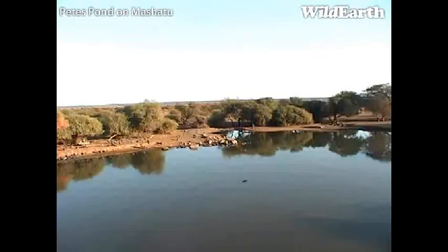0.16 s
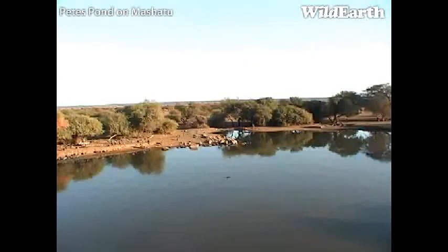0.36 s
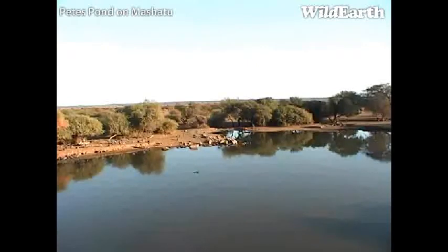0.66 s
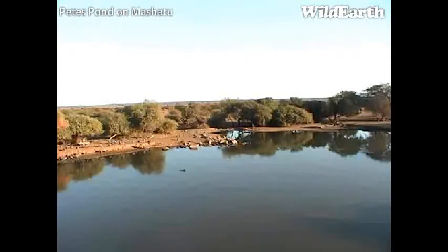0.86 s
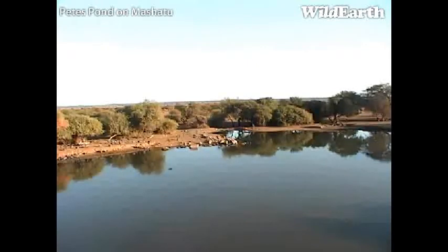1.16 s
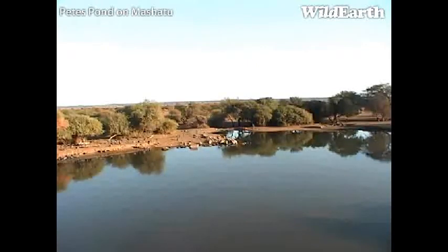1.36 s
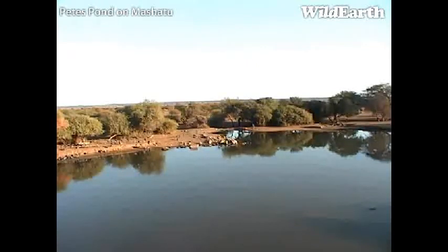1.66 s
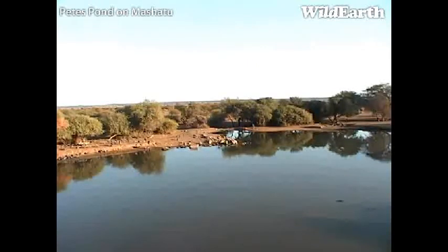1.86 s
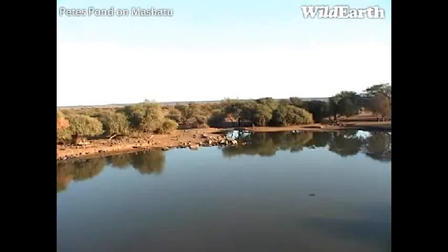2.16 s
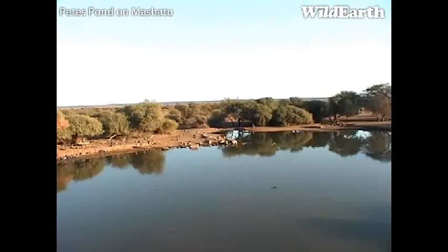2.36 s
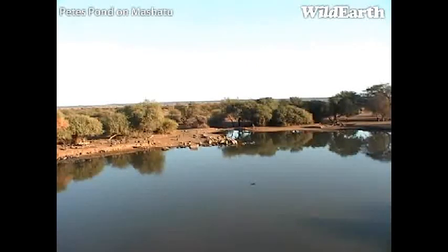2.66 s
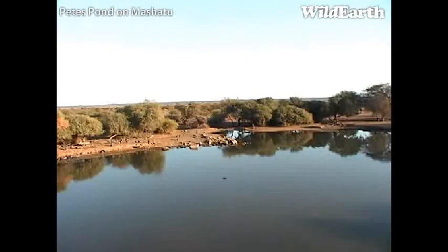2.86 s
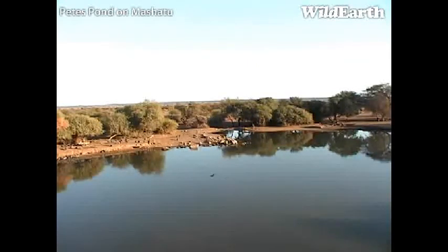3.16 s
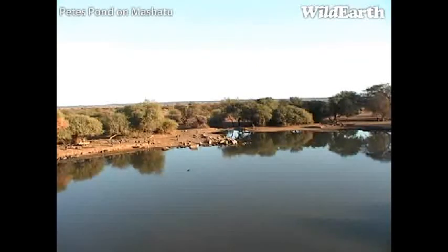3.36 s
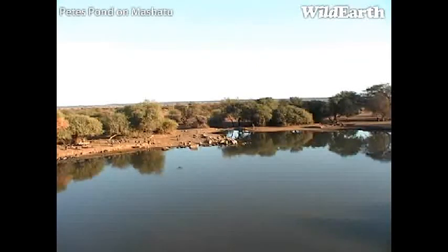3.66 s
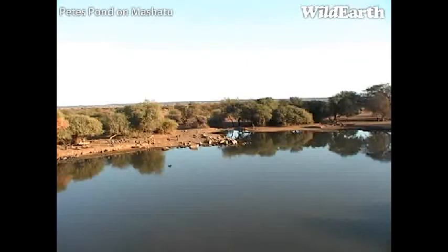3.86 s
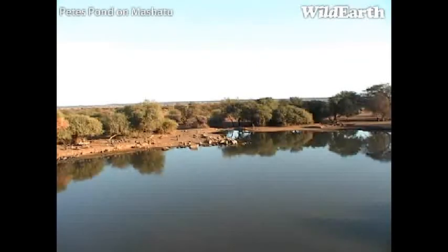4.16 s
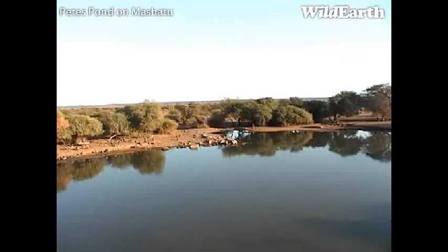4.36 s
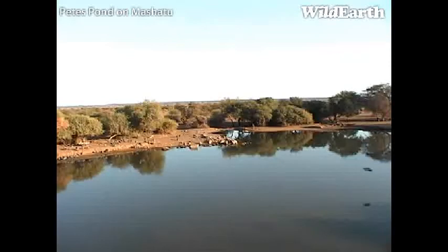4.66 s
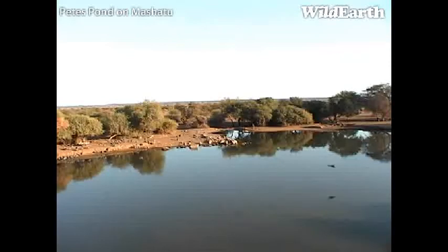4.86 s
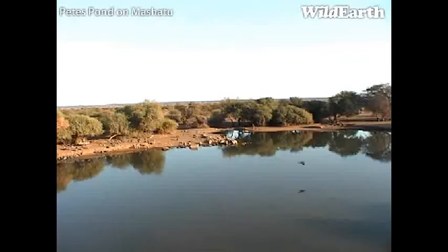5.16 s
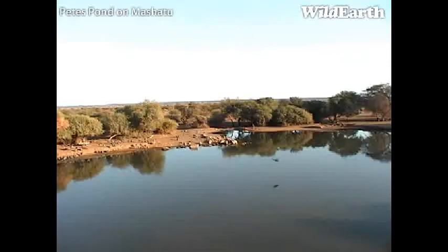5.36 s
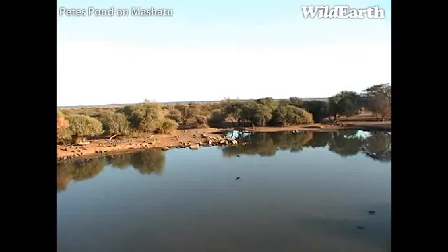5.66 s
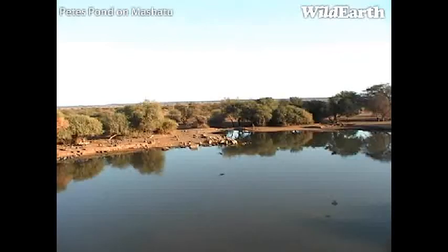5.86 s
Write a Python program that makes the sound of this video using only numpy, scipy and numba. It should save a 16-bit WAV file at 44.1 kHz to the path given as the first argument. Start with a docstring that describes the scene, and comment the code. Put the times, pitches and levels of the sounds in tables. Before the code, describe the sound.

An outdoor waterhole with a close guineafowl flock, heard almost in the centre, nearer calls a touch left. From 0 to 0.7 seconds scattered low knocks sit in a soft churr, with quick nasal chips and several ragged rasps around 0.25 to 0.5. From about 0.8 the knocks gather into overlapping runs, roughly nine a second each, hollow and throaty. A harsh cackle bursts at 1.4, others at 2.25 and 2.7, with thin whistles near 1.3, 1.6 and 2.2. Knocking is strongest from 2.3 to 3.2. Clear high peeps come at 3.4 and 3.6, fluttering whistles around 3.9 to 4.2, and a clipped cackle with a cheep at 4.6. Softer knocks continue through small cheeps, a dry tick at 5.4 and chips until 6. Faint distant twitter, low airy rush, slight hum and a weak bank echo lie beneath.

```python
"""Overlapping runs of low knocks, about nine a second in a run, lead a guineafowl flock's dense churr.
Nearer birds add short chips, thin whistles, cheeps, rasps and a few loud cackles over a haze of far twitter.
Knocks are sagging sines and the churr is pulses ringing many throats; calls are swept tones, pulse trains
and noise. The waterhole's bank returns a faint echo of the nearer birds; a low rush and hum lie beneath."""
import sys
import numpy as np
from scipy import signal
from scipy.fft import rfft, irfft, next_fast_len
from scipy.io import wavfile
from scipy.ndimage import uniform_filter1d
from numba import njit

SR = 44100
rng = np.random.default_rng(int(sys.argv[2]) if len(sys.argv) > 2 else 0)


def output_pcm(signal):
    """Save a mono or channel-first signal as 16-bit PCM at the path in sys.argv[1].

    Samples are clipped to [-1, 1] before scaling.
    """
    pcm = np.clip(np.atleast_2d(signal).T, -1, 1) * 32767
    wavfile.write(sys.argv[1], SR, np.round(pcm).astype(np.int16))


N = 264820
TIME = np.arange(N) / SR

# Low knocks from several callers. Each row: time in seconds, peak level in dB.
KNOCK_TIMES = [(.118, -20.5), (.261, -18.5), (.331, -20), (.66, -21), (.774, -16), (.99, -18.5),
               (1.002, -17.5), (1.113, -15), (1.195, -19), (1.225, -12), (1.338, -12.5), (1.413, -16),
               (1.452, -14.5), (1.527, -15), (1.561, -20), (1.637, -14.5), (1.672, -18.5), (1.748, -14.5),
               (1.791, -14), (1.861, -15), (1.894, -16.5), (1.973, -12.5), (2.008, -16), (2.086, -13.5),
               (2.199, -13), (2.245, -17), (2.316, -10.5), (2.431, -15), (2.546, -9), (2.663, -9),
               (2.785, -12.5), (2.904, -12.5), (2.933, -14.5), (3.027, -12), (3.154, -10.5), (3.238, -16.5),
               (3.264, -16.5), (3.282, -15.5), (3.354, -15.5), (3.391, -16.5), (3.436, -18), (3.499, -13),
               (3.567, -17), (3.61, -16), (3.727, -17), (3.843, -15.5), (4.021, -17.5), (4.136, -17),
               (4.17, -16.5), (4.252, -17), (4.302, -17.5), (4.364, -16), (4.491, -16), (4.542, -14),
               (4.61, -16.5), (4.665, -16.5), (4.735, -19.5), (4.756, -17.5), (4.788, -11.5),
               (4.857, -19.5), (4.876, -19), (4.915, -15.5), (4.988, -17), (5.062, -22), (5.1, -17),
               (5.217, -20), (5.293, -22), (5.329, -18), (5.405, -18.5), (5.443, -17), (5.524, -18.5),
               (5.557, -14), (5.639, -16), (5.755, -21.5), (5.793, -13.5), (5.872, -17)]
# Centre pitch of the churr. Each row: time in seconds, frequency in Hz.
CHURR_CENTRE = [(0.0, 594), (0.18, 496), (0.58, 559), (0.629, 711), (1.548, 622), (2.809, 692.5),
                (4.359, 591), (5.3, 753), (6.0, 728)]
# Spectrum of the far twitter, which also colours snaps and rasps. Each row: frequency in Hz, gain in dB.
TWITTER_SPECTRUM = [(700, 0), (1400, 2.5), (2600, 2.5), (3800, -1.5), (5100, 0), (5900, -6), (6500, -19.5),
                    (7100, -10), (8200, -25), (10000, -27), (15500, -30)]


def undb(db):
    """Decibels to gain."""
    return 10 ** (np.asarray(db) / 20)


def unit(x):
    """Scale to rms 1."""
    return x / np.sqrt(np.mean(x ** 2) + 1e-18)


def colour(x, points):
    """Filter by a (Hz, dB) spectrum, interpolated over log frequency."""
    hz, db = np.transpose(points)
    size = next_fast_len(len(x) + 512)
    f = np.maximum(np.fft.rfftfreq(size, 1 / SR), 1)
    gain = undb(np.interp(np.log2(f), np.log2(hz), db))
    return irfft(rfft(x, size) * gain, size)[:len(x)]


def walk(rate_hz, size=N):
    """Smooth random drift with a spread near 1."""
    step = max(int(SR / rate_hz), 1)
    held = np.repeat(rng.standard_normal(size // step + 2), step)
    smooth = uniform_filter1d(uniform_filter1d(held, step), step)
    return np.sqrt(2) * smooth[:size]


def clicks(rate_hz, scatter_db, size=N):
    """Randomly timed pulses of either sign and uneven strength."""
    fires = rng.random(size) < rate_hz / SR
    return fires * rng.choice([-1, 1], size) * undb(scatter_db * rng.standard_normal(size))


def add(out, s, sound):
    """Mix a sound in, centred on time s."""
    start = int(s * SR) - len(sound) // 2
    lo, hi = max(start, 0), min(start + len(sound), N)
    if hi > lo:
        out[lo:hi] += sound[lo - start:hi - start]


def syllable(length_s, edge):
    """Time through a call (-1 at its start, 1 at its end, tails to -2 and 2) and its rounded swell."""
    u = np.linspace(-2, 2, max(int(2 * length_s * SR), 64))
    swell = np.exp(-np.abs(u) ** edge)
    return u, swell - swell[0]


def tone(length_s, hz, fall, bend, waver=0.0059, octave_db=-25, edge=7.8):
    """A nearly pure note that falls in pitch and bends: a positive bend scoops, a negative one arches."""
    u, swell = syllable(length_s, edge)
    pitch_hz = hz * (1 - fall * u / 2 + bend * u ** 2 + waver * walk(400, len(u)))
    phase = 2 * np.pi * np.cumsum(pitch_hz) / SR
    return swell * unit(np.sin(phase) + undb(octave_db) * np.sin(2 * phase))


def rattle(size, hz, depth):
    """A harsh voice opens and shuts in uneven pulses."""
    cycles = np.cumsum(hz * (1 + 0.19 * walk(250, size))) / SR + rng.random()
    return np.exp(depth * np.cos(2 * np.pi * cycles))


def pulse_train(hz, scatter_db, spread_s):
    """One pulse a cycle, of uneven strength, each smeared a little on its way through the grass."""
    cycles = np.cumsum(hz) / SR + rng.random()
    # ramp each step over one sample, so pulses fall between samples
    steps = np.floor(cycles) + np.minimum(cycles % 1 * SR / hz, 1)
    pulses = np.diff(steps, prepend=steps[0]) * undb(scatter_db * walk(400, len(hz)))
    paths = rfft(rng.standard_normal(len(hz)) * np.exp(-TIME[:len(hz)] / spread_s))
    # only the phase of the paths is used
    return unit(irfft(rfft(pulses) * paths / np.abs(paths), len(hz)))


@njit
def resonate(x, hz, width_hz):
    """A state-variable band-pass whose centre and width move."""
    y, band, low = np.empty(len(x)), 0., 0.
    for i in range(len(x)):
        g, damping = np.tan(np.pi * hz[i] / SR), width_hz[i] / hz[i]
        v = (band + g * (x[i] - low)) / (1 + g * (g + damping))
        band, low = 2 * v - band, low + 2 * g * v
        y[i] = damping * v
    return y


def hum(hz=149, rms_db=-73.5):
    """A faint, steady sine."""
    return undb(rms_db) * unit(np.sin(2 * np.pi * hz * TIME))


def open_air(level_db=-52, drift_db=2.9, low_hz=255, high_hz=400):
    """The soft low rush of the open bush: band-passed noise with a drifting level."""
    band = signal.butter(4, [low_hz, high_hz], "band", fs=SR, output="sos")
    noise = unit(signal.sosfilt(band, rng.standard_normal(N)))
    return noise * undb(level_db + drift_db * walk(14))


def twitter(level_db, flicker_db=3.0, count=9):
    """Far birds blur into a haze of noise whose bands flicker separately."""
    edges_hz = np.geomspace(700, 16000, count + 1)
    out = 0
    for band_hz in zip(edges_hz, edges_hz[1:]):
        band = signal.butter(3, band_hz, "band", fs=SR, output="sos")
        noise = signal.sosfilt(band, rng.standard_normal(N))
        out = out + noise * undb(flicker_db * walk(45))
    return unit(colour(out, TWITTER_SPECTRUM)) * undb(level_db)


def far_peeps(rate_hz=8, level_db=-53.5, scatter_db=3, length_s=0.025, centre_hz=4300, glide=0.24):
    """Stray faint swept sines from the back of the flock, most of them falling."""
    out = np.zeros(N)
    for when, height, slope, strength in rng.random((int(rate_hz * N / SR), 4)) * 2 - 1:
        u, swell = syllable(length_s, 8.2)
        sweep = glide * (slope - .5) * u / 2
        pitch_hz = centre_hz * (1 + 0.18 * height + sweep + 0.024 * walk(1200, len(u)))
        note = unit(np.sin(2 * np.pi * np.cumsum(pitch_hz) / SR))
        add(out, (when + 1) / 2 * N / SR, undb(level_db + scatter_db * strength) * swell * note)
    return out


def bank(x, t60_s=0.31, echo_db=-17):
    """Diffuse return from the shore and its bushes: convolution with decaying noise."""
    t = TIME[:SR // 2]
    tail = rng.standard_normal(len(t)) * undb(-60 * t / t60_s)
    return undb(echo_db) * signal.fftconvolve(x, tail / np.linalg.norm(tail))[:N]


def ticks(t60_s=0.011, relative_width=0.09, length_s=0.022):
    """A dry snap that dies at once: a noise burst through a resonance."""
    # Each row: start in seconds, centre in Hz, noise level ahead of decay and resonance in dB.
    snaps = [(5.4, 5500, -14.5)]
    out = np.zeros(N)
    age = np.arange(-length_s, length_s, 1 / SR)
    for s, hz, db in snaps:
        burst = rng.standard_normal(len(age)) * (age >= 0) * undb(-60 * np.abs(age) / t60_s)
        ring = signal.iirpeak(hz, 1 / relative_width, fs=SR)
        add(out, s, undb(db) * signal.lfilter(*ring, burst))
    return out


def peeps(arch=.018):
    """Clear peeps from small birds nearby: near-pure notes that arch over and fall."""
    # Each row: centre in seconds, length in seconds, pitch in Hz, fall as share of pitch, level in dB.
    calls = [(2.222, 0.021, 4550, 0.25, -45), (2.983, 0.042, 4270, 0.067, -39),
             (3.408, 0.023, 4840, 0.068, -30.5), (3.597, 0.038, 4776, 0.0364, -32),
             (5.774, 0.044, 3170, 0.07, -44.5)]
    out = np.zeros(N)
    for s, length_s, hz, fall, db in calls:
        add(out, s, undb(db) * tone(length_s, hz, fall, -arch))
    return out


def cheeps(scoop=0.064):
    """Soft, purer notes that scoop, most of them falling."""
    # Each row: centre in seconds, length in seconds, pitch in Hz, fall as share of pitch, level in dB.
    calls = [(.291, 0.037, 4060, 0.02, -42.5), (.964, .022, 4000, 0.17, -50),
             (3.437, .022, 3580, 0.17, -45), (4.22, 0.027, 4560, 0.32, -43),
             (4.626, 0.01, 4100, -0.037, -33), (4.821, 0.0099, 4300, .15, -43),
             (5.232, 0.029, 4760, .11, -43.5), (5.255, .013, 4060, -0.06, -38),
             (5.614, 0.02, 4240, -0.000017, -40.5), (5.629, 0.029, 3600, -0.0074, -44.5),
             (5.714, 0.023, 4450, .03, -49)]
    out = np.zeros(N)
    for s, length_s, hz, fall, db in calls:
        add(out, s, undb(db) * tone(length_s, hz, fall, scoop, octave_db=-36, edge=3.5))
    return out


def whistles(scoop=.03, scoop_per_fall=0.23, flutter_db=3.0, swell_db=2):
    """Thin, fluttering whistles that swell towards the end; the further one falls, the deeper it scoops."""
    # Each row: centre in seconds, length in seconds, pitch in Hz, fall as share of pitch,
    # level in dB ahead of swell and flutter.
    calls = [(1.27, 0.091, 2970, 0.13, -44), (1.573, 0.11, 2940, 0.062, -47.5),
             (2.176, 0.055, 2690, .041, -44), (3.881, 0.13, 3010, 0.14, -46),
             (4.017, .041, 3030, -0.084, -43), (4.219, 0.1, 3033, -0.018, -42),
             (5.837, 0.058, 2950, -0.026, -52.5)]
    out = np.zeros(N)
    for s, length_s, hz, fall, db in calls:
        note = tone(length_s, hz, fall, scoop + scoop_per_fall * fall)
        rise_db = swell_db * np.linspace(-1, 1, len(note))
        add(out, s, undb(db + rise_db + flutter_db * walk(97, len(note))) * note)
    return out


def rasps(rattle_hz=520, speed_up=.75, arch=.15, throat_arch=0.041, jitter=.11, scatter_db=3,
          smear_s=.0004, air_db=-20, open_width_hz=2500, tight_width_hz=900,
          beak_hz=5000, beak_width_hz=700, beak_db=-9):
    """A ragged rattle quickens into a pitched buzz as the throat tightens; the beak adds a fixed resonance."""
    # Each row: centre in seconds, length in seconds, throat resonance in Hz, its sweep as share of pitch,
    # level in dB.
    calls = [(0.262, 0.034, 3920, .22, -32.5), (.333, 0.034, 3050, -.15, -33.5),
             (.413, .035, 3400, -0.12, -28), (0.493, 0.05, 3400, -.12, -33.5),
             (1.294, 0.054, 4500, .08, -39.5), (1.662, 0.042, 4630, -0.037, -41.5),
             (1.895, 0.043, 3200, -.1, -40), (1.946, 0.027, 3130, -.1, -38),
             (4.348, 0.036, 4400, 0.06, -43.5)]
    out = np.zeros(N)
    for s, length_s, hz, sweep, db in calls:
        u, swell = syllable(length_s, 1.6)
        slack = (1 - np.tanh(2 * u)) / 2
        # the pulses steady as they quicken, and sag again at the end
        unsteady = jitter * slack ** 2 * walk(900, len(u))
        rate_hz = rattle_hz * np.exp(speed_up * (.5 - slack) - arch * u ** 2 + unsteady)
        air = undb(air_db) * rng.standard_normal(len(u))
        source = pulse_train(rate_hz, scatter_db, smear_s) + air
        centre_hz = hz * np.exp(sweep * (.5 - slack) - throat_arch * u ** 2)
        width_hz = tight_width_hz + (open_width_hz - tight_width_hz) * slack
        throat = resonate(resonate(source, centre_hz, width_hz), centre_hz, width_hz)
        throat = throat * np.sqrt(open_width_hz / width_hz)
        beak = resonate(source, np.full(len(u), float(beak_hz)), np.full(len(u), float(beak_width_hz)))
        voice = unit(colour(throat + undb(beak_db) * beak, TWITTER_SPECTRUM))
        add(out, s, undb(db) * swell * voice)
    return out


def chips(tremor=0.016, harsh_jitter=.018, jitter_rate_hz=1500, smear_rad=1.4, rattle_hz=330, arch=0.0191,
          trim_db=1, harsh_air_db=-6.98, fall=0.38, beak_width_hz=900, skirt=0.65,
          clear_s=0.0097, harsh_s=0.02, level_pitch_hz=2132, glide_per_octave=.24):
    """Short nasal harmonic calls; the beak favours partials near its resonance, and long calls turn pulsed."""
    # Each row: centre in seconds, length in seconds, pitch in Hz, lift of the upper partials in dB,
    # beak resonance in Hz, level in dB ahead of trim_db.
    calls = [(0.034, 0.016, 1864, -6, 3900, -37.5), (0.098, 0.01, 1927, 4.5, 3900, -31),
             (0.226, 0.015, 1806, 10.5, 5300, -28), (0.382, 0.015, 2336, 27, 4600, -31),
             (0.509, 0.013, 2355, 10, 4700, -29.5), (0.579, 0.011, 1905, 2, 4000, -40.5),
             (0.634, 0.0093, 1820, -4, 3800, -40), (.705, 0.017, 1740, 3, 4900, -36),
             (.973, 0.013, 2375, 30, 4700, -35), (1.061, 0.011, 1735, 11, 3500, -33),
             (1.304, 0.014, 1676, 3, 4900, -36), (1.537, 0.01, 1936, 2, 3900, -39),
             (1.895, 0.012, 1835, -3.5, 3900, -38), (3.512, .016, 1902, 4, 5170, -35.5),
             (3.979, 0.023, 1874, 3, 3900, -38), (4.157, 0.018, 2220, 8, 4500, -38),
             (4.231, 0.011, 1887, -6, 3800, -38.5), (4.409, 0.0075, 1783, -6.5, 3900, -36.5),
             (4.713, 0.016, 2250, -1.5, 4700, -30.5), (4.831, 0.0073, 1890, 3, 3700, -32.5),
             (5.273, 0.016, 1714, -4, 4700, -43.5), (5.467, 0.013, 1715, -4, 5100, -40.5),
             (5.514, 0.011, 1703, 13, 3400, -35), (5.864, 0.011, 1654, 8, 4500, -34)]
    # Overall beak spectrum. Each row: frequency in Hz, gain in dB.
    beak_spectrum = [(1200, -7), (1800, 3), (2300, 5.5), (2900, 0), (3700, 1.5), (5100, -0.5), (6200, -8.5),
                     (8000, -27), (10000, -14.5), (15000, -36.5)]
    out = np.zeros(N)
    for s, length_s, hz, lift_db, beak_hz, db in calls:
        rough = np.clip((length_s - clear_s) / (harsh_s - clear_s), 0, 1)
        # lower chips fall, higher ones rise
        glide = glide_per_octave * np.log2(hz / level_pitch_hz)
        u, swell = syllable(length_s, 4.5)
        waver = (tremor + harsh_jitter * rough ** 2) * walk(jitter_rate_hz, len(u))
        pitch_hz = hz * (1 + glide * u / 2 - arch * u ** 2 + waver)
        phase = 2 * np.pi * np.cumsum(pitch_hz) / SR
        upper = 0
        for k in range(2, 8):
            peak = skirt + np.exp(-((k * hz - beak_hz) / beak_width_hz) ** 2)
            resonance = peak * min(beak_hz / (k * hz), 1) ** fall
            # the higher the partial, the more it smears
            smear = smear_rad * rough * (k - 1) * walk(900, len(u))
            upper = upper + resonance * np.sin(k * phase + smear)
        # the pulses chop the upper partials and the air more than the fundamental
        pulses = rattle(len(u), rattle_hz, rough)
        air = undb(harsh_air_db) * rough * rng.standard_normal(len(u))
        partials = unit(np.sin(phase) * pulses ** 0.19 + undb(lift_db) * upper * pulses)
        voice = unit(colour(partials + air * pulses, beak_spectrum))
        add(out, s, undb(db + trim_db) * swell * voice)
    return out


def cackles(handover_db=3.0, ragged_db=3.0, pulse_hz=340, jitter=0.041, waver=.008, top_hz=5500):
    """Both sides of the syrinx sound unrelated notes in uneven pulses; the high, gliding one takes over."""
    # Each row: centre in seconds, length in seconds, low note in Hz, high note in Hz, its rise as share
    # of pitch, its lift in dB, pulse depth, grating in dB, level in dB.
    calls = [(1.406, .025, 2147, 4700, 0.15, -4.5, 1.4, -5.5, -22.5),
             (2.249, 0.03, 2250, 4750, 0.08, 11, 0.4, 0.5, -26.5),
             (2.721, 0.025, 2217, 4050, .016, -6.5, 0.57, -5.5, -24.5),
             (4.634, .015, 1886, 3600, -.1, -1, 0.77, -3.5, -27.5)]
    # Spectrum of the grating. Each row: frequency in Hz, gain in dB.
    grate_spectrum = [(1200, -18), (1800, 2.5), (2500, -5), (3100, -4), (4200, 2.5), (5100, 3), (5700, -6),
                      (8000, -27.5), (10000, -20.5), (15000, -41)]
    out = np.zeros(N)
    for s, length_s, low_hz, high_hz, rise, lift_db, depth, grate_db, db in calls:
        u, swell = syllable(length_s, 3.5)
        low_pitch_hz = low_hz * (1 + waver * walk(387, len(u)))
        high_pitch_hz = high_hz * (1 + rise * u / 2 + waver * walk(900, len(u)))
        low = np.sin(2 * np.pi * np.cumsum(low_pitch_hz) / SR)
        high = np.sin(2 * np.pi * np.cumsum(high_pitch_hz) / SR)
        lean_db = handover_db * np.tanh(u)
        notes = unit(undb(-lean_db) * low + undb(lift_db + lean_db) * high)
        grate = unit(colour(rng.standard_normal(len(u)), grate_spectrum))
        cycles = np.cumsum(pulse_hz * (1 + jitter * walk(198, len(u)))) / SR + rng.random()
        ragged = undb(ragged_db * walk(412, len(u)))
        pulses = unit(np.exp(depth * np.cos(2 * np.pi * cycles)) * ragged)
        # the throat passes little below the low note; the grating reaches higher
        throat = signal.butter(4, [low_hz, top_hz], "band", fs=SR, output="sos")
        voice = unit(signal.sosfilt(throat, notes * pulses))
        add(out, s, undb(db) * swell * unit(voice + undb(grate_db) * grate * pulses))
    return out


def churr(level_db, rate_hz=300, scatter_db=3.5, bed_db=-1.2, surge_db=-13.7, surge_sigma_s=0.0077,
          surge_lag_s=0.0022, ring_width_hz=240, follow=0.8, drift_db=1, shared=0.38, count=9):
    """Pulses from many throats, each with its own resonance, swell together around each knock."""
    # Spectrum of the churr. Each row: frequency in Hz, gain in dB.
    churr_spectrum = [(60, -21), (130, -29.5), (200, -24), (300, -15.5), (420, -3.5), (560, 1.5), (720, 1),
                      (950, -4.5), (1150, -10.5), (1400, -28.5), (2500, -14.5)]
    # Breadth of the churr. Each row: time in seconds, lift one octave from its centre in dB.
    breadth = [(2.8, 0), (3.3, -8.5), (4.4, -1.5), (6, -7)]
    centre_s, centre_hz = np.transpose(CHURR_CENTRE)
    mean_hz = np.mean(centre_hz)
    # the whole flock leans higher or lower
    lean_octaves = np.interp(TIME, centre_s, np.log2(centre_hz / mean_hz))
    breadth_db = np.interp(TIME, *np.transpose(breadth))
    # some pulses are broad enough to ring every resonance at once
    broad = shared * clicks(rate_hz, scatter_db)
    _, swell = syllable(2 * np.sqrt(2) * surge_sigma_s, 2)
    steady, surging = 0, 0
    for hz in np.geomspace(230, 1350, count):
        octaves = np.log2(hz / mean_hz)
        lean_db = 20 * follow * lean_octaves * octaves
        shape = undb(lean_db + breadth_db * np.minimum(np.abs(octaves), 1) ** 2)
        power = undb(level_db + bed_db + drift_db * walk(10)) ** 2
        for s, peak_db in KNOCK_TIMES:
            add(power, s + surge_lag_s, swell * undb(peak_db + surge_db) ** 2)
        ring = signal.iirpeak(hz, hz / ring_width_hz, fs=SR)
        pulses = clicks(rate_hz, scatter_db) + broad
        voice = unit(signal.lfilter(*ring, signal.lfilter(*ring, pulses))) * np.sqrt(hz)
        steady = steady + voice
        surging = surging + voice * shape * np.sqrt(power)
    # the steady sum sets the scale, so the levels survive
    return colour(surging, churr_spectrum) / np.std(colour(steady, churr_spectrum))


def knocks(ring_s=.0047, sag=0.16, snap_db=-29, overtone_db=-26, octaves_per_db=0.0271, usual_db=-17,
           spread_octaves=0.067):
    """The nearest pulse of each surge: a sagging sine, deeper and brighter when strong, with a faint snap."""
    out = np.zeros(N)
    u, swell = syllable(ring_s, 2)
    for s, peak_db in KNOCK_TIMES:
        octaves = octaves_per_db * (usual_db - peak_db) + spread_octaves * rng.standard_normal()
        hz = np.interp(s, *np.transpose(CHURR_CENTRE)) * 2 ** octaves
        phase = 2 * np.pi * (np.cumsum(hz * (1 - sag * u)) / SR + rng.random())
        overtone = undb(overtone_db + peak_db - usual_db) * np.sin(2 * phase)
        snap = undb(snap_db) * unit(colour(rng.standard_normal(len(u)), TWITTER_SPECTRUM))
        add(out, s, undb(peak_db) * swell * (np.sin(phase) + overtone + snap))
    return out


def scene(left_db=0.4):
    """Flock, haze, echo, rush and hum in the centre; the nearer birds a touch to the left."""
    # The whole flock. Each row: time in seconds, low churr level ahead of bed_db in dB,
    # far twitter level in dB.
    flock = [(0, -32.5, -50), (.5, -32.5, -49.5), (1.4, -28.5, -46.5), (2.1, -27.5, -46), (2.8, -26, -44),
             (3.3, -26.5, -50), (3.9, -28.5, -47), (4.6, -31.5, -47.5), (5.2, -30.5, -52), (6, -30, -48.5)]
    s, churr_points_db, twitter_points_db = np.transpose(flock)
    churr_db = np.interp(TIME, s, churr_points_db)
    twitter_db = np.interp(TIME, s, twitter_points_db)
    birds = chips() + cackles() + cheeps() + whistles() + peeps() + rasps() + ticks()
    background = hum() + open_air() + twitter(twitter_db) + far_peeps() + bank(birds)
    centre = background + churr(churr_db) + knocks()
    return centre + birds * undb(np.array([[left_db], [-left_db]]) / 2)


def record(dry, low_cut_hz=100, top_hz=15800):
    """The microphone thins the bass and the recorder cuts the top."""
    thin = signal.sosfilt(signal.butter(2, low_cut_hz, "high", fs=SR, output="sos"), dry)
    return signal.sosfilt(signal.ellip(10, .2, 70, top_hz, fs=SR, output="sos"), thin)


dry = scene()
out = record(dry)
output_pcm(out)
```